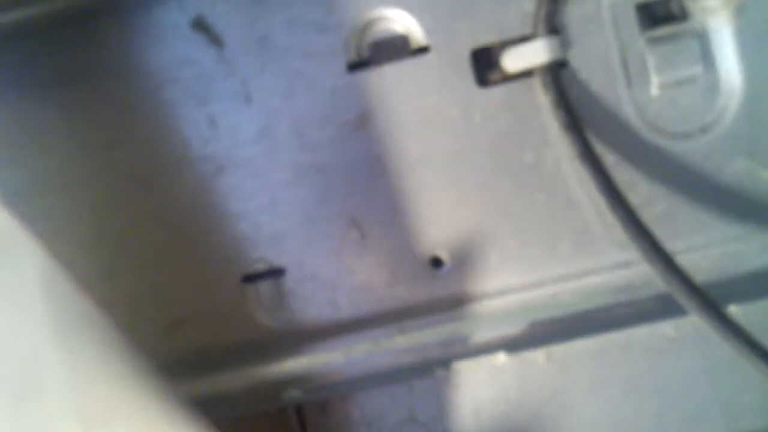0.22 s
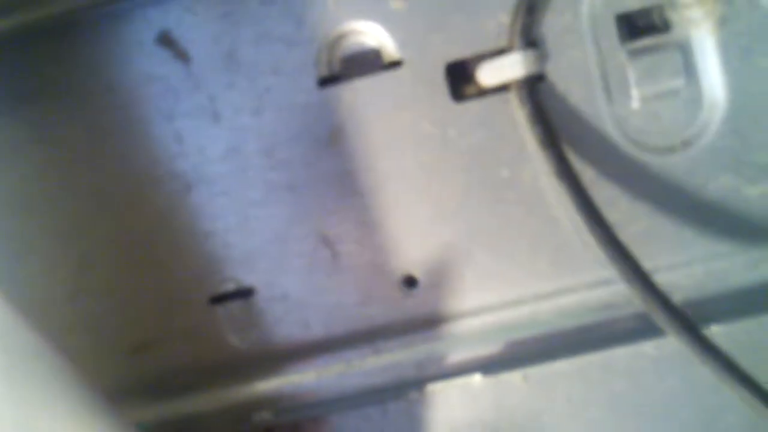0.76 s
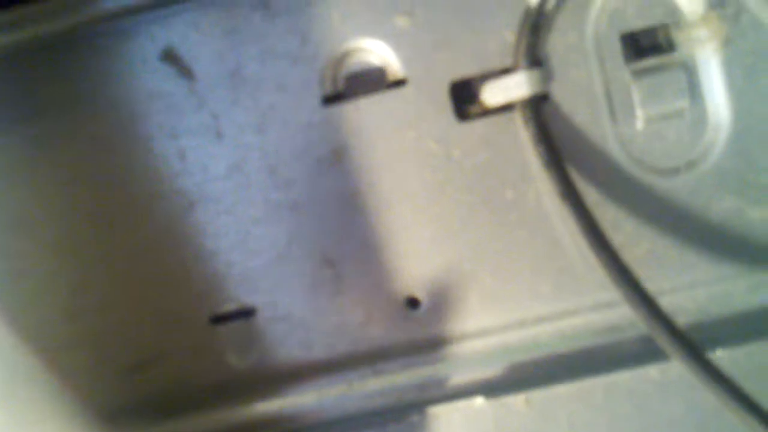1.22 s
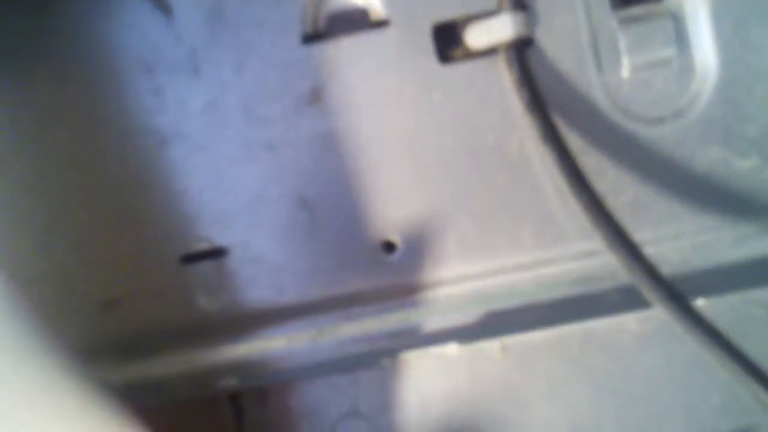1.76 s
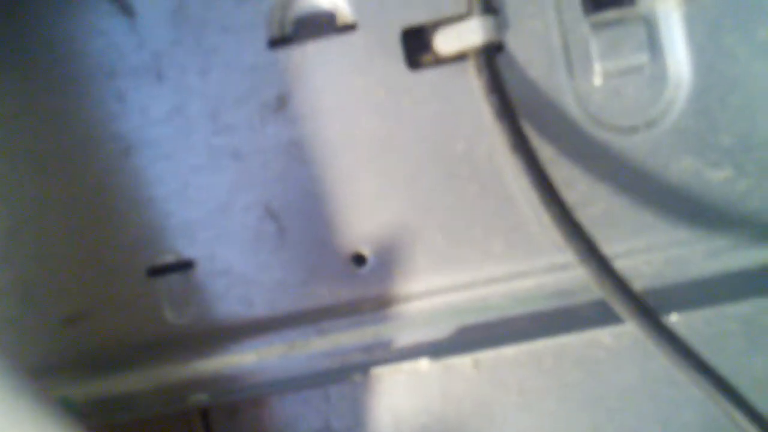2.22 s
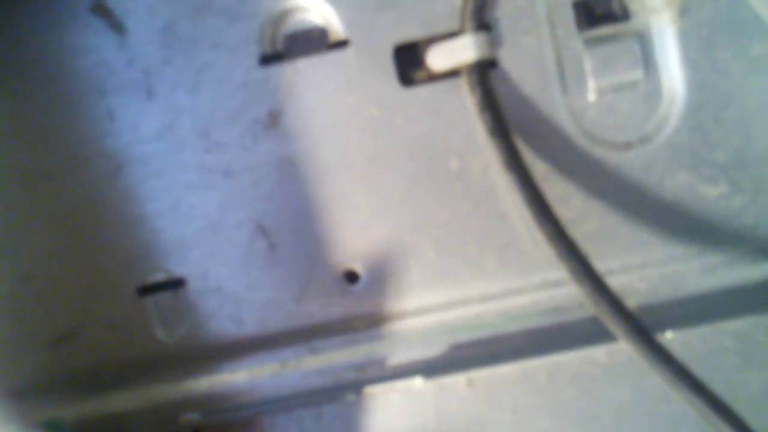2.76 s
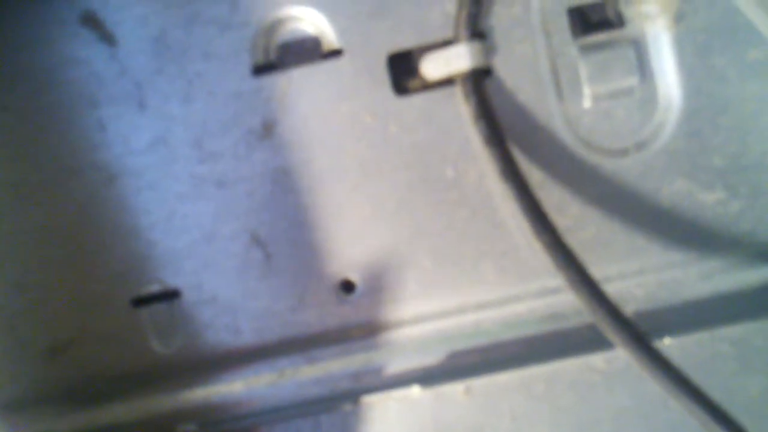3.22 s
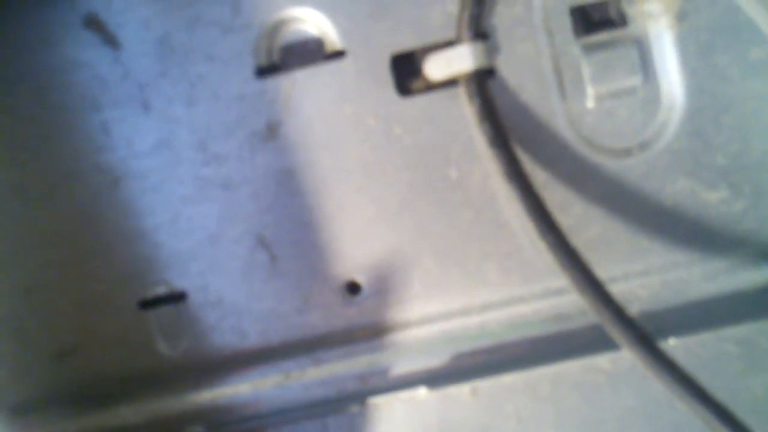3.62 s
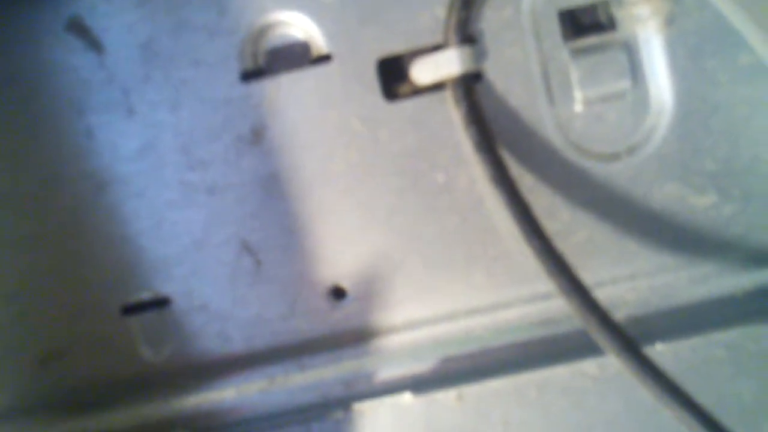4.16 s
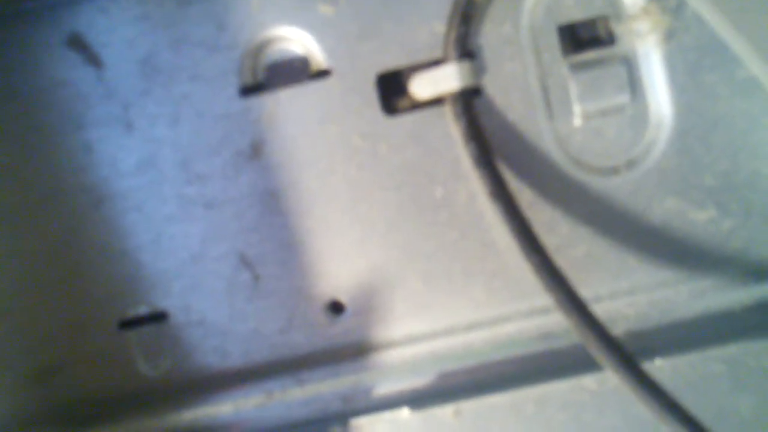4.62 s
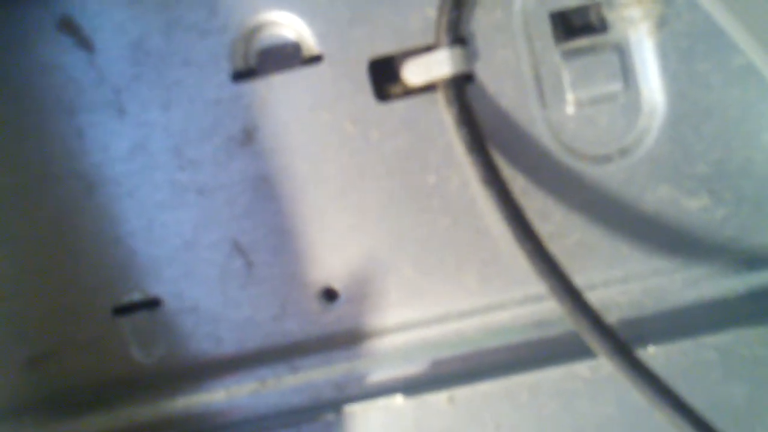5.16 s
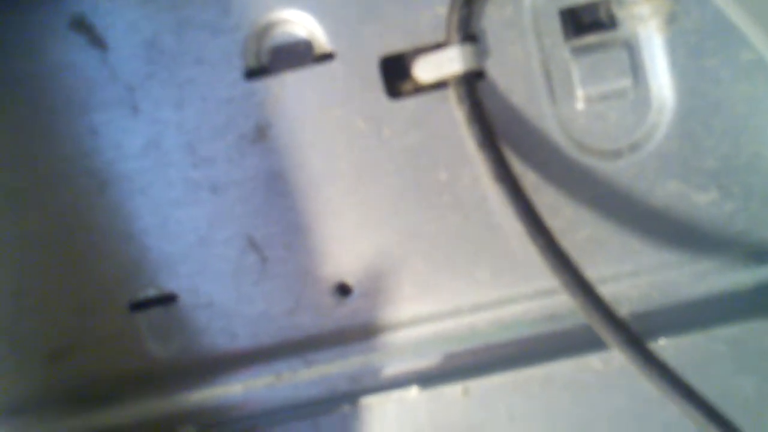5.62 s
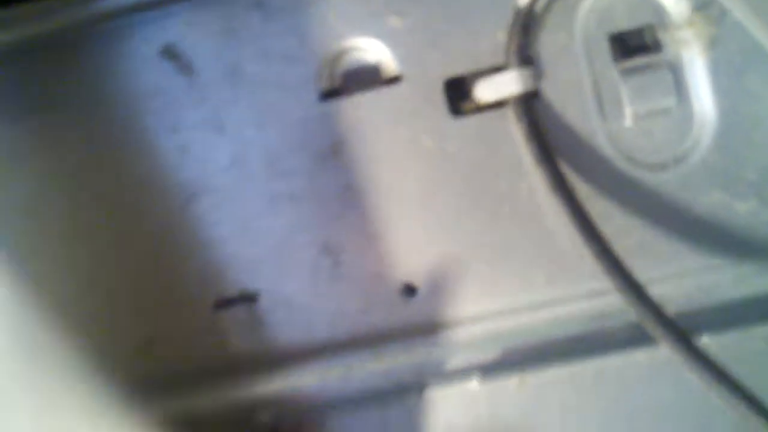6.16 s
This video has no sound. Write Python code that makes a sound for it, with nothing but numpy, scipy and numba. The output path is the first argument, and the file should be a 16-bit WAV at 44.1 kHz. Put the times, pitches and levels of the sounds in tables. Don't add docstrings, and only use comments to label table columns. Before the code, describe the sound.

A small plastic stick clicks, scrapes and taps on a thin sheet-metal computer case, with sharp knocks near the end over faint hiss.

```python
import sys
import numpy as np
from scipy import signal
from scipy.fft import rfft, irfft, next_fast_len
from scipy.io import wavfile
from scipy.ndimage import uniform_filter1d
from numba import njit

SR = 44100
rng = np.random.default_rng(int(sys.argv[2]) if len(sys.argv) > 2 else 0)


def nominal_scale(level):
    x = np.asarray(level, float) / 20
    return 10 ** x


def generate_wav(signal):
    frames = np.transpose(np.atleast_2d(signal))
    scaled = np.clip(frames, -1, 1) * 32767
    pcm = np.round(scaled).astype(np.int16)
    wavfile.write(sys.argv[1], SR, pcm)


N = 282240

# (frequency [Hz], density [dB per Hz])
PORT_HISS = [(40, -6), (110, 2), (200, -6), (700, -14.5), (2500, -23.5), (5500, -28.5), (9000, -25),
             (14000, -24)]
HISS_DB = -62.5
# (frequency [Hz], level [dB rms])
CAMERA_BUZZ = [(93, -113), (186, -71), (274, -72), (370, -77.5)]
# (frequency [Hz], decay by 60 dB [s])
ROOM_DECAY = [(150, 0.88), (600, 0.29), (2000, 0.21), (8000, 0.16)]
# (frequency [Hz], gain [dB])
CROSS_FEED = [(300, 8), (1000, -2), (3000, -1.3), (5000, -8.5), (8000, -12.5), (14000, -9)]
NOTCH_HZ = 2587
# (frequency [Hz], gain [dB])
BODY_SHADOW = [(100, 5.5), (400, -8.5), (800, -2.5), (1500, -17.5), (4000, 0.5), (14000, -1.5)]
# (frequency [Hz], gain [dB])
MICROPHONE_BAND = [(20, -26), (60, -14), (110, -4), (180, 0), (13900, 0), (14250, -45), (22000, -60)]
# (time [s], thud [dB], thud frequency [Hz], creak over thud [dB], creak length [s])
SHELL_BUMPS = [
    (0.836, -59.5, 217, -22, 0.011),
    (1.638, -48, 189, -13.5, 0.0057),
    (3.007, -45, 174, -4.5, 0.028),
    (5.081, -56.5, 170, -7, 0.012),
]
CREAK_HZ = 1060
# (frequency [Hz], level [dB], decay by 60 dB [s])
PANEL_MODES = [(122, -8, 0.3), (200, 3, 0.38), (370, 8, 0.18), (784, 1, 0.13), (1400, 2.5, 0.1),
               (2000, 2, 0.083), (2830, 4, 0.042), (3350, 7, 0.013), (5900, -16, 0.023)]
# (frequency [Hz], density [dB per Hz])
TICK_TREBLE = [(1500, 5.5), (2500, 6), (4000, -4.5), (6000, -9), (9000, -14), (14000, -17)]
# (frequency [Hz], density [dB per Hz])
EDGE_RUSTLE = [(1500, 6.5), (3000, 3), (5000, -4.5), (8000, -8), (14000, -9)]
# (time of most force [s], swell [s], release [s], force [dB], brightest mode [Hz])
HISSING_RUBS = [
    (0.32, 0.18, 0.3, -62.5, 1670),
    (0.65, 0.044, 0.043, -47, 854),
    (1.19, 0.1, 0.2, -57.5, 790),
    (1.386, 0.068, 0.22, -57, 1050),
    (1.536, 0.009, 0.0061, -57, 910),
    (2.677, 0.027, 0.0071, -62, 800),
    (4.16, 0.12, 0.071, -66, 1130),
    (5.886, 0.01, 0.0063, -46.5, 890),
    (5.982, 0.012, 0.004, -49.5, 1100),
    (6.018, 0.014, 0.021, -25.5, 915),
]
# (time of most force [s], swell [s], release [s], force [dB],
# brightest mode [Hz])
DULL_DRAGS = [
    (1.96, 0.13, 0.057, -62.5, 760),
    (2.342, 0.016, 0.081, -52, 1060),
    (3.89, 0.04, 0.035, -42, 1310),
    (5.79, 0.087, 0.057, -48, 970),
    (6.212, 0.045, 0.0084, -53, 1180),
    (6.343, 0.02, 0.26, -48, 1160),
]
# (force at its ends [dB], hiss at start [dB], at most force [dB], at the end [dB])
RUB_STROKE, DRAG_STROKE = (-20.5, 13.5, 1.5, 3), (-15.5, 3, -11.5, -6)
# (time [s], force [dB], squeak [Hz], length [s])
SHARP_SLIPS = [
    (0.174, -61, 1670, 0.062),
    (0.324, -59, 1630, 0.024),
    (0.449, -28.5, 1210, 0.0234),
    (0.631, -53, 855, 0.031),
    (1.377, -46, 1098, 0.027),
    (2.317, -38.5, 1246, 0.029),
    (2.425, -50.5, 1267, 0.053),
    (2.561, -63.5, 1230, 0.032),
    (5.0, -61, 1110, 0.047),
]
# (time [s], force [dB], squeak [Hz], length [s])
SEAT_JUDDERS = [
    (5.329, -52, 1090, 0.022),
    (5.379, -50, 1100, 0.025),
    (5.437, -44, 1145, 0.0227),
    (5.504, -57, 1160, 0.0215),
    (5.552, -50, 1130, 0.0264),
    (5.592, -61, 1140, 0.041),
    (6.333, -41, 1230, 0.0424),
    (6.358, -39.5, 1060, 0.0243),
    (6.387, -35.5, 1050, 0.0296),
]
# (tick over squeak [dB], low panel over squeak [dB], squeak width [Hz])
SHARP_EDGE, DULL_EDGE = (-19.5, -20, 74), (-37, -11.5, 225)
# (time [s], level [dB], strongest ring [Hz], top sizzle over it [dB], decay [s])
EDGE_SNAPS = [(0.444, -4, 3570, -4.5, 0.0068), (0.5, -2.5, 1620, -11.5, 0.0056),
              (1.5359, -20.5, 1680, 6, 0.0029), (1.8151, -18.5, 2040, -4.5, 0.0048),
              (1.9014, -15, 1570, -14, 0.002), (2.1954, -38.5, 4000, -22, 0.0084),
              (2.2673, -4.5, 1840, -48, 0.0016), (3.265, -49, 1600, -21, 0.008),
              (3.3867, -31, 1740, -4, 0.0048), (3.8757, -20, 1630, -12, 0.014),
              (4.264, -34, 1900, -25, 0.0079), (5.093, -48, 1840, -26, 0.003),
              (5.2369, -29.5, 1610, -9, 0.012), (5.665, -30.5, 1410, 7, 0.0065),
              (5.7614, -38.5, 4100, 3.5, 0.019), (5.7917, -49, 1600, -15, 0.006),
              (5.8865, -26, 1890, -30, 0.017)]
# (time [s], blow [dB], centre of the ring [Hz], tick over ring [dB], ring length factor)
STIFF_RIM_TAPS = [(0.086, -28.5, 960, -33, 0.38), (0.445, -21, 1170, -13.5, 0.82),
                  (0.5, -26, 1230, -2, 0.48), (1.816, -43.5, 2000, -11, 2.5),
                  (2.264, -22.5, 1430, -32, 0.88), (2.677, -33.5, 650, -21, 1.52),
                  (3.265, -25.5, 750, -24.5, 0.92), (3.856, -38.5, 1430, -27, 0.72),
                  (3.875, -28, 1630, -39, 1.4), (3.901, -31.5, 744, -31, 1.1),
                  (4.262, -52, 960, -9.5, 0.59), (4.703, -44, 784, -22, 0.87),
                  (5.094, -28.5, 1580, -21.5, 0.67), (5.226, -29, 1080, -28, 0.88),
                  (5.984, -17.5, 1250, -15.5, 0.8), (6.005, -21.5, 960, -8, 0.48),
                  (6.011, -11.5, 1080, -12, 0.59)]
# (time [s], blow [dB], centre of the ring [Hz], tick over ring [dB])
HALFWAY_TAPS = [(0.08, -36.5, 715, -20), (0.479, -30, 450, -9), (1.37, -43.5, 1130, -4),
                (1.547, -30.5, 1090, -18), (2.123, -44, 875, -15), (2.295, -42, 850, -13),
                (2.863, -46, 692, -20), (3.294, -32.5, 476, -24), (3.849, -35, 1510, -25),
                (3.891, -28.5, 1660, -52), (5.235, -33.5, 1050, -13.5), (5.856, -42, 630, -13),
                (6.212, -24.5, 1100, -27)]
# (time [s], blow [dB], centre of the ring [Hz], tick over ring [dB])
OPEN_SHEET_TAPS = [(0.452, -35, 330, -19), (0.506, -27, 800, -8), (1.19, -49, 400, -18),
                   (1.535, -28, 410, -13), (2.689, -43, 720, -16), (2.915, -50.5, 720, -17),
                   (3.136, -41.5, 810, -17), (3.603, -55.5, 756, -27), (3.816, -43, 576, -14.5),
                   (5.744, -43, 1250, -9), (5.761, -36.5, 654, -20), (5.792, -34.5, 1190, -14),
                   (5.886, -30, 810, -16), (6.016, -21, 460, -13), (6.217, -39, 467, -9),
                   (6.344, -50, 1110, -12)]
# (low panel over ring [dB], contact [s], ring length factor where all taps share it)
RIM_SPOT, INNER_SPOT, SHEET_SPOT = (-32, 0.0011), (-19, 0.0072, 1), (-5.5, 0.0032, 1)


def evened(x):
    return x / np.sqrt(np.mean(x ** 2) + 1e-20)


def read(points, hz):
    f, value = np.transpose(points)
    return np.interp(np.log(hz + 1), np.log(f + 1), value)


def add(mix, s, sound):
    part = mix[..., round(s * SR):][..., :sound.shape[-1]]
    part += sound[..., :part.shape[-1]]


def coloured(x, points):
    size = next_fast_len(x.shape[-1] + 4096)
    gain = nominal_scale(read(points, np.fft.rfftfreq(size, 1 / SR)))
    return irfft(rfft(x, size) * gain, size)[..., :x.shape[-1]]


def lumpy(points, depth_db):
    hz = np.geomspace(points[0][0], points[-1][0], num=24)
    return np.transpose([hz, read(points, hz) + depth_db * rng.standard_normal(24)])


def resonate(x, hz, width):
    turn = np.exp(2j * np.pi * np.cumsum(hz * np.ones(x.shape[-1])) / SR)
    r = np.exp(-np.pi * width / SR)
    return 2 * (turn * signal.lfilter([1 - r], [1, -r], x / turn)).real


def port_noise(size, same):
    a, b = rng.standard_normal((2, size))
    same = np.clip(same, 0, 1)
    return np.array([a, same * a + np.sqrt(1 - same ** 2) * b])


def floor():
    drift_db = .9 * evened(uniform_filter1d(rng.standard_normal((2, N)), 5000))
    noise = evened(coloured(port_noise(N, 0.0057), PORT_HISS)) * nominal_scale(HISS_DB + drift_db + [[-1], [1]])
    buzz = sum(nominal_scale(db) * evened(resonate(rng.standard_normal(N), hz, 11.3)) for hz, db in CAMERA_BUZZ)
    return noise + buzz * nominal_scale([[-12], [0]])


def room(x):
    taps = np.zeros((2, SR // 2))
    at = np.arange(200, SR // 2 - 20, 20) + rng.integers(0, 20, (2, (SR // 2 - 201) // 20))
    np.put_along_axis(taps, at, rng.choice([-1., 1.], at.shape), 1)
    hz, t, z = signal.stft(taps, SR, nperseg=256)
    decay = nominal_scale(-60 * t / read(ROOM_DECAY, hz)[:, None])
    tail = signal.istft(z * decay, SR, nperseg=256)[1]
    return signal.fftconvolve(x, tail / np.linalg.norm(tail[0]), axes=1)[:, :N]


def bump(s, thud_db, thud_hz, creak_db, length):
    t = np.arange(3500) / SR
    turns = thud_hz * t
    swing = np.sin(2 * np.pi * turns ** 0.74)
    thud = swing * np.minimum(5.7 * turns, 1) * np.exp(-turns * 0.94)
    press = np.clip(np.sin(np.pi * np.minimum(t / np.clip(length, .003, .06), 1)), 0, 1) ** 0.27
    creak = rng.standard_normal(3500) * press
    for _ in range(4):
        creak = resonate(creak, CREAK_HZ, 1070)
    treble = evened(coloured(rng.standard_normal(3500), TICK_TREBLE) * press)
    creak = evened(coloured(creak, [(1750, 7), (2200, -22)])) + nominal_scale(-16.5) * treble
    sound = thud + nominal_scale(creak_db) * creak / abs(creak).max()
    return s, nominal_scale(thud_db + 20.0) * sound * nominal_scale([[-30], [0]])


@njit
def ring_out(start, step, size):
    out = np.zeros((2, size))
    for k in range(len(step)):
        near, far = start[0, k], start[1, k]
        for n in range(min(size, int(np.log(1e-3) / np.log(abs(step[k]))))):
            out[0, n] += near.imag
            out[1, n] += far.imag
            near *= step[k]
            far *= step[k]
    return out


def panel(centre_hz, low_db, ring, octaves):
    chance = rng.standard_normal((4, 96))
    hz = 130 + 6000 * np.linspace(0, 1, num=96) ** 1.7
    hz = hz * (1 + 0.027 * chance[0])
    table = np.array(PANEL_MODES)
    near_db = np.maximum(-6 * (np.log2(hz / centre_hz) / octaves) ** 2, -20)
    db = read(table[:, :2], hz) + np.where(hz < 400, low_db + 8.5, near_db) + 3.26 * chance[1]
    t60 = read(table[:, ::2], hz) * np.clip(ring, .15, 3)
    step = nominal_scale(-60 / (SR * t60)) * np.exp(2j * np.pi * hz / SR)
    late = 2 * np.pi * hz * 0.00022 + chance[3] * np.minimum(hz / 1500, 1.5)
    start = nominal_scale(db) * np.exp(1.3j * chance[2] - 1j * np.outer([0, 1], late))
    low = np.searchsorted(np.sort(hz), 500)
    t = np.arange(8000) / SR
    slow = ring_out(start[:, :low].copy(), step[:low].copy(), size=8000) * (1 - np.exp(-t / 0.0033))
    quick = ring_out(start[:, low:].copy(), step[low:].copy(), size=8000) * (1 - np.exp(-t / 0.00075))
    return (slow + quick) / np.linalg.norm(nominal_scale(db[hz > 400]))


def stroke(s, swell, release, force_db, bright_hz, ends_db, *hiss_db):
    times = s - max(swell, .004), s, s + max(release, .004)
    return np.transpose([times, force_db + ends_db * np.array([1, 0, 1]), np.full(3, bright_hz), hiss_db])


def scrape(rows):
    s, *columns = np.transpose(rows)
    t = np.arange(s[0], s[-1], 1 / SR)
    force_db, bright_hz, hiss_db = (np.interp(t, s, c) for c in columns)
    grains = port_noise(SR // 2, 0.31) * nominal_scale(1.7 * rng.exponential(1, SR // 2))
    clumps_db = 3 * evened(uniform_filter1d(rng.standard_normal(SR // 2), 200))
    grains = (grains * nominal_scale(clumps_db))[:, :len(t)]
    body = signal.fftconvolve(panel(bright_hz.mean(), -19, 0.38, 1.9), grains[:1])[:, :len(t)]
    bright = resonate(resonate(grains, bright_hz, 200), bright_hz, 200)
    hiss = nominal_scale(hiss_db - 3.0) * evened(coloured(grains, EDGE_RUSTLE))
    sound = evened(body) + 0.41 * evened(bright) + hiss
    return s[0], nominal_scale(force_db) * sound * signal.windows.tukey(len(t), .15)


def slip(s, force_db, squeak_hz, tick_db, low_db, width, length):
    size = round(np.clip(length, .005, .08) * SR)
    grains = rng.standard_normal(4000) * rng.exponential(1, 4000)
    press = np.pad(signal.windows.tukey(size, .7), (0, 4000 - size))
    drive = grains * press
    body = signal.fftconvolve(panel(squeak_hz, low_db, 0.29, 0.75), drive[None])[:, :4000]
    squeak = resonate(resonate(drive, squeak_hz, width), squeak_hz, width)
    over_hz, over_width = 2.75 * squeak_hz, 1.8 * width
    overtone = resonate(resonate(drive, over_hz, over_width), over_hz, over_width)
    hiss = evened(coloured(port_noise(4000, 0.33), TICK_TREBLE)) * press
    upper = overtone / abs(overtone).max() + 0.51 * hiss
    ring = 0.9 * body / abs(body).max() + squeak / abs(squeak).max()
    return s - 0.108 * length, nominal_scale(force_db - 1) * (ring + nominal_scale(tick_db + 2.5) * upper)


def snap(s, db, ring_hz, top_db, decay):
    t = np.arange(3000) / SR
    noise = port_noise(3000, 0.074)
    treble = evened(coloured(noise, lumpy([(1200, -26), (1800, 39.0), (6000, 17.0), (7500, -17)], 1.0)))
    sizzle = evened(coloured(noise, [(5500, -8), (7000, 4), (14000, -1)]))
    ring = evened(resonate(noise, ring_hz, 400))
    fall = np.exp(-t / np.clip(decay, .001, .02)) * np.minimum(t / 0.0022, 1)
    return s, nominal_scale(db - 21.5) * (0.49 * treble + 0.63 * ring + nominal_scale(top_db) * sizzle) * fall


def tap(s, blow_db, centre_hz, tick_db, low_db, contact, ring):
    t = np.arange(8000) / SR
    chatter = rng.standard_normal(300) * (rng.random(300) < .08) * np.exp(-t[:300] / 0.00063)
    chatter[0] = 3.2
    chatter = chatter / np.linalg.norm(chatter)
    modes = panel(centre_hz, low_db, ring, 0.77 * (1000 / centre_hz) ** 0.14)
    rings = signal.fftconvolve(modes, chatter[None])[:, :8000]
    ring = np.clip(ring, .15, 3)
    fall = np.exp(-t / (0.0058 * ring)) + nominal_scale(-9.5) * np.exp(-t / (0.013 * ring))
    tick = evened(coloured(port_noise(8000, 0.22), lumpy(TICK_TREBLE, 1.34))) * fall
    onset = np.minimum(t / max(contact, 1e-4), 1)
    return s, nominal_scale(blow_db - 7.0) * (rings + nominal_scale(tick_db + 10.5) * tick) * onset


def scene():
    case, shell = np.zeros((2, 2, N))
    for row in SHELL_BUMPS:
        add(shell, *bump(*row))
    for table, ends in ((HISSING_RUBS, RUB_STROKE), (DULL_DRAGS, DRAG_STROKE)):
        for row in table:
            add(case, *scrape(stroke(*row, *ends)))
    for table, edge in ((SHARP_SLIPS, SHARP_EDGE), (SEAT_JUDDERS, DULL_EDGE)):
        for s, force_db, squeak_hz, length in table:
            add(case, *slip(s, force_db, squeak_hz, *edge, length))
    for row in EDGE_SNAPS:
        add(case, *snap(*row))
    for *blow, ring in STIFF_RIM_TAPS:
        add(case, *tap(*blow, *RIM_SPOT, ring))
    for table, spot in ((HALFWAY_TAPS, INNER_SPOT), (OPEN_SHEET_TAPS, SHEET_SPOT)):
        for row in table:
            add(case, *tap(*row, *spot))
    case = case + nominal_scale(-16.0) * room(case)
    return np.array([case[0], coloured(case[1], BODY_SHADOW)]) + shell + floor()


def roll_off(x):
    return signal.sosfilt(signal.butter(12, 15320, fs=SR, output="sos"), x)


def record(dry):
    size = next_fast_len(N + SR // 4)
    hz = np.fft.rfftfreq(size, 1 / SR)
    padded = np.pad(dry, ((0, 0), (0, size - N)), "linear_ramp")
    squashed = .16 * np.tanh(padded / .16)
    ports = rfft(squashed) * nominal_scale(read(MICROPHONE_BAND, hz))
    delay = np.exp(-2j * np.pi * hz / NOTCH_HZ)
    other = ports[::-1] * nominal_scale(np.minimum(read(CROSS_FEED, hz), 0)) * delay
    mix = irfft(ports - other, size)[:, :N]
    return roll_off(mix)


dry = scene()
out = record(dry)
generate_wav(out)
```